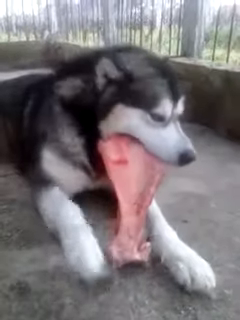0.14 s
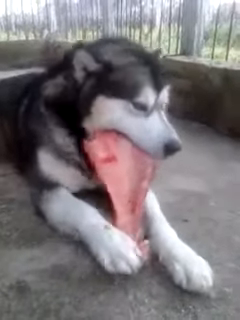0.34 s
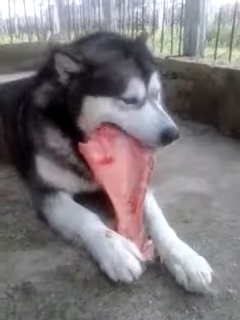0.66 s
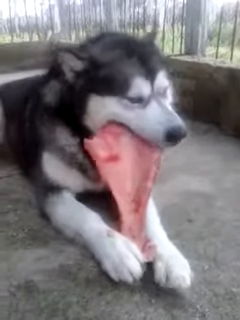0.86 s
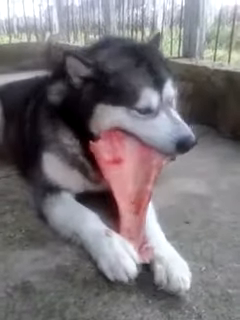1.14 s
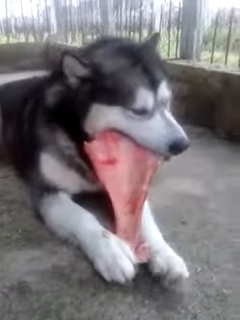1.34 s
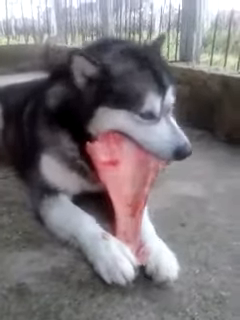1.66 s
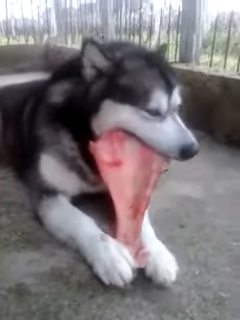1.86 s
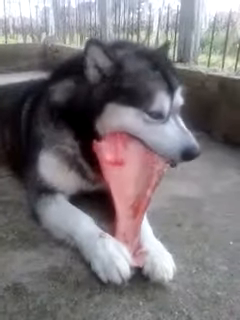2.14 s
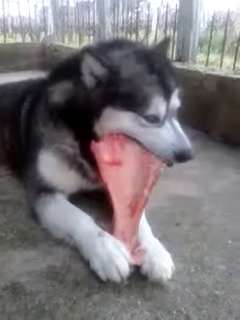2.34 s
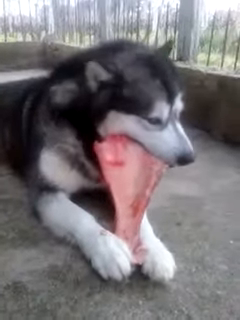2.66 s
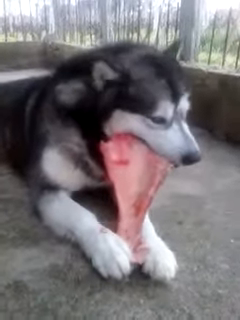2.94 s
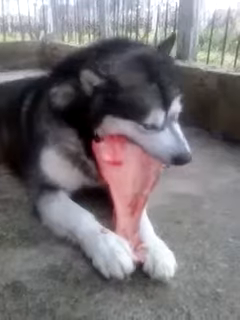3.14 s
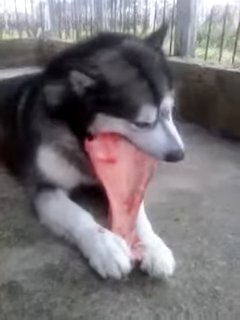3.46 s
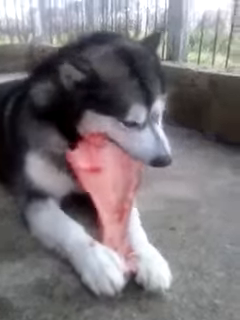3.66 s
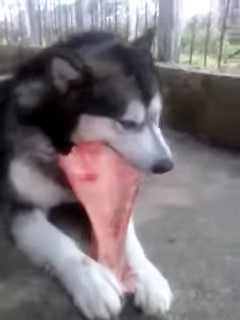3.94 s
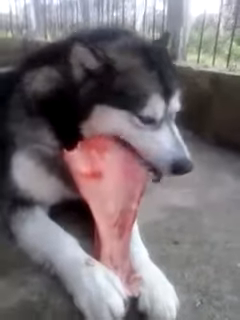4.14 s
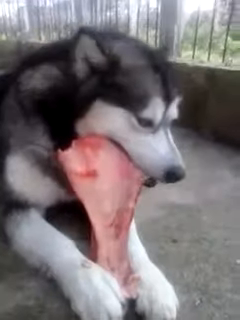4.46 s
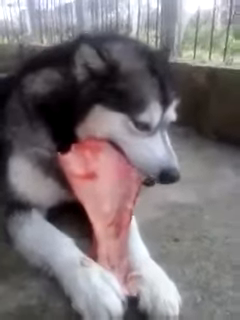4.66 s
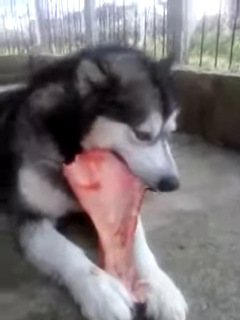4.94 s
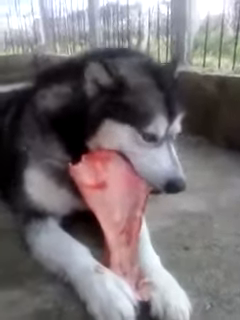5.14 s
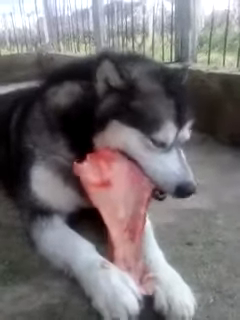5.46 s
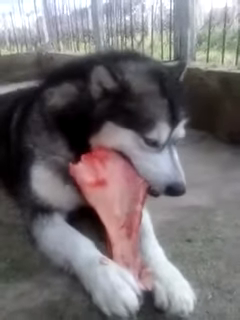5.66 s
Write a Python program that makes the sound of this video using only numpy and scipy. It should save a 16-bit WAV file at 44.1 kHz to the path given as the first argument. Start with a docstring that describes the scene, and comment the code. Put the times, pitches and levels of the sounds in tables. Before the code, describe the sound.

Brittle bone crunches in short loud bursts between quiet wet grinding and soft knocks, as a dog chews outdoors on a hard terrace.

```python
"""On a concrete terrace, close by, a dog scuffs a paw, then gnaws a big raw bone.
Rasps are dense trains of tiny slips, cracks are short snaps, and knocks are dull, briefly ringing blows.
These sounds and a faint grinding ring on, come directly and off the floor, and leave a faint tail.
A dragged tooth squeaks, two low thumps sound under loud cracks, and a far-off whine sinks away at the start.
Shaped noise makes the rumble and hiss of the outdoor background."""
import sys
import numpy as np
from scipy import signal
from scipy.fft import rfft, irfft
from scipy.io import wavfile
from scipy.ndimage import uniform_filter1d, minimum_filter1d, map_coordinates

SR = 44100
rng = np.random.default_rng(int(sys.argv[2]) if len(sys.argv) > 2 else 0)


def dump(signal):
    """Clip the signal to [-1, 1] and save it as 16-bit WAV at the path in sys.argv[1]."""
    limited = np.clip(np.atleast_2d(signal).T, -1, 1)
    pcm = np.round(limited * 32767).astype(np.int16)
    wavfile.write(sys.argv[1], SR, pcm)


N = 255339  # length [samples]
TIME = np.arange(N) / SR  # [s]
TAPS = 2048  # length of each impulse response [samples]
BLOW_S = .006  # a crack or knock has the energy of its level held for this long [s]
SLIPS_PER_S = 2400

# scrapes that swell and let go: a paw scuffing the concrete in the first two rows, then bites:
# (time of greatest pressure [s], rise [s], release [s], level [dB], extra body below 1 kHz [dB],
# extra zing near 8 kHz [dB], extra air above 11 kHz [dB], pitch of the scraped spot [Hz])
SCRAPES = [(0.241, 0.027, 0.046, -41.5, 13, -3, -3, 1340), (.268, 0.037, 0.039, -37.5, 12, -8, -7, 3060),
           (0.395, 0.02, 0.089, -48, 10.5, -4.5, -4, 2100), (0.987, 0.028, .05, -55.5, 18.5, -12, -13, 540),
           (1.433, .05, .018, -33, -2.5, 3, 3.5, 2480), (1.483, 0.045, .022, -41, -8, -5, 8, 8000),
           (1.522, 0.074, 0.065, -42, 1.5, -1, 6, 8000), (1.97, 0.055, .04, -53.5, 8.5, 2.5, 5, 7140),
           (2.068, 0.065, 0.045, -54, 13.5, -3.5, 1.5, 1510), (2.171, 0.03, .06, -56.5, 10, -2, 6, 7500),
           (2.324, 0.042, 0.035, -43.5, 8.5, 2, -3, 1340), (2.384, 0.027, 0.098, -31, -2.5, 0.5, 0, 7470),
           (2.505, 0.015, 0.014, -15.5, -0.5, -0.5, -1.5, 8250),
           (2.563, 0.021, 0.014, -40, -31, 4, 4.5, 6770), (3.232, 0.02, 0.048, -46, 3.5, 2.5, 3, 8640),
           (3.387, 0.013, 0.023, -40, 2, 2.5, 5, 7640), (3.434, 0.023, 0.046, -41, -3, -3, 0.5, 8800),
           (3.601, 0.062, 0.031, -26, 4, -0.5, -1, 8050), (3.661, 0.011, 0.0065, -13, 3.5, -4, -2, 8140),
           (3.686, 0.015, 0.019, -31, -33, -2, 4, 8100), (3.954, 0.15, 0.1, -57.5, 9.5, -6, -5, 7400),
           (4.224, .04, 0.091, -55, 8.5, -2.5, -5, 7800), (4.599, 0.048, 0.035, -53, 3, -4.5, 3, 8040),
           (4.681, .04, 0.042, -41.5, 7, -3, -2, 8500), (4.728, 0.038, 0.08, -41, 9.5, -1.5, 2.5, 5300),
           (4.789, 0.017, 0.032, -34, 4.5, 4, 1.5, 5400), (4.895, 0.023, 0.035, -24.5, -1, 0, 2.5, 2130),
           (4.954, 0.018, 0.013, -12, 0, 3, 2, 1940), (5.14, 0.084, 0.078, -55.5, 5, -8.5, -14, 8400),
           (5.431, 0.058, 0.077, -56, 4, -2, -6, 4400), (5.663, 0.0099, 0.006, -35, 13.5, 3.5, 3, 1850)]


def gain_of(db):
    """Turns decibels into amplitude."""
    return 10 ** (np.asarray(db) / 20)


def evened(x):
    """Scales a signal to an rms (average strength) of one."""
    return x / np.sqrt(np.mean(x ** 2) + 1e-20)


def read(points, hz):
    """Reads a curve of (Hz, value) points joined on a logarithmic frequency axis."""
    f, value = np.transpose(points)
    return np.interp(np.log(hz + 1), np.log(f + 1), value)


def add(mix, s, sound):
    """Mixes a sound in, starting at time s."""
    part = mix[max(round(s * SR), 0):][:len(sound)]
    part += sound[:len(part)]


def hump(hz, centre_hz, width=.11):
    """The outline of one resonance, of height one; width is its half width as a share of its pitch."""
    return 1 / (1 + ((hz / centre_hz - 1) / width) ** 2)


def wander(rate_hz):
    """A random signal of rms one, with little movement faster than rate_hz."""
    hz = np.fft.rfftfreq(N, 1 / SR)
    spectrum = rfft(rng.standard_normal(N))
    return evened(irfft(spectrum * np.exp(-(hz / rate_hz) ** 2), N))


def response(curve_db):
    """A pulse of energy one that starts at once and whose spectrum has the shape of curve_db(Hz)."""
    log_gain = np.log(gain_of(curve_db(abs(np.fft.fftfreq(TAPS, 1 / SR)))))
    # the Hilbert transform finds the phase that lets the energy come as early as possible
    spectrum = np.exp(np.conj(signal.hilbert(log_gain)))
    pulse = np.fft.ifft(spectrum).real
    return pulse / np.linalg.norm(pulse)


def splinter(body_db, zing_db, air_db, own_hz, own_db=6):
    """A short snap with the brittle spectrum of breaking bone, tinted, with a brief ring of its own."""
    # breaking bone: (frequency [Hz], relative level [dB per Hz])
    brittle = [(59, -59.5), (100, -43), (497, -10), (668, -13), (727, -7), (843, -10), (1210, -6.5),
               (1960, -4), (2370, -5), (3850, -5), (6260, -10), (8230, -2), (9950, -13.5), (12300, -10),
               (15500, -25.5)]
    tint = [(900, body_db), (1900, 0), (5000, 0.014), (7200, zing_db), (9000, zing_db), (11000, air_db)]
    return response(lambda hz: read(brittle, hz) + read(tint, hz) + own_db * hump(hz, own_hz))


def grains(per_s, spread_db):
    """A train of tiny slips at random moments, of uneven size and either sign, with rms one."""
    chance, size, sign = rng.random((N, 3)).T
    sizes = gain_of(spread_db * np.minimum(-np.log(1 - size), 3))
    happens = chance < per_s / SR
    return evened(sizes * np.sign(sign - .5) * happens)


def dispersed(snap, run_s, chance, uneven_db):
    """Each part of the spectrum leaves the contact at its own moment and with its own strength."""
    spectrum = rfft(snap)
    place = np.linspace(0, 1, len(spectrum))
    moment, strength = (np.interp(place, np.linspace(0, 1, len(c)), c) for c in chance)
    delay_s = .0005 + moment * run_s
    # a delay that depends on frequency is a phase that adds up along the spectrum
    phase = 2 * np.pi * np.cumsum(delay_s) * SR / len(snap)
    uneven = spectrum * gain_of(uneven_db * strength)
    fade = np.minimum(np.linspace(2, 0, len(snap)), 1) ** 2
    ragged = fade * irfft(uneven * np.exp(-1j * phase))
    return ragged / np.linalg.norm(ragged)


def singing(rows, width_hz):
    """An unsteady tone that flutters in pitch and strength along rows of (s, Hz, dB)."""
    s, hz, db = np.transpose(rows)
    pitch_hz = np.interp(TIME, s, hz) + width_hz * wander(width_hz) / 2
    turns = np.cumsum(pitch_hz) / SR
    level = gain_of(np.interp(TIME, s, db)) * (TIME >= s[0]) * (TIME <= s[-1])
    flutter = 1 + wander(width_hz) / 2
    return np.sqrt(2) * level * flutter * np.sin(2 * np.pi * turns)


def background(level_db=-62):
    """Noise forms a distant rumble that comes and goes, under a thin steady hiss."""
    # outdoor background: (frequency [Hz], relative level [dB per Hz])
    air = [(15, -29), (25, -9.5), (129, -7), (297, -19.5), (482, -20), (631, -27), (826, -29), (1270, -24),
           (9810, -39.5), (15500, -29)]
    hz = np.fft.rfftfreq(N, 1 / SR)
    spectrum = rfft(rng.standard_normal(N)) * gain_of(read(air, hz))
    rumble = irfft(spectrum * (hz < 200), N)
    hiss = irfft(spectrum * (hz >= 200), N)
    swell_db = 2.5 * wander(rate_hz=6)
    return gain_of(level_db) * evened(rumble * gain_of(swell_db) + hiss)


def whine():
    """A faint far-off whine, a fluttering tone, sinks away."""
    # path of the whine: (time [s], pitch [Hz], level [dB])
    whine_path = [(0, 1115, -64), (.1, 1080, -67), (.2, 1020, -78), (.3, 925, -73), (.42, 800, -73),
                  (.52, 775, -80)]
    return singing(whine_path, width_hz=170)


def scatter(t60, onset_s):
    """Random reflections of energy one, with each band dying at its own speed."""
    hz, t, z = signal.stft(rng.standard_normal(SR), SR, nperseg=256)
    # t60 is the time a band takes to fall by 60 dB
    decay = np.exp(-np.log(1000) * t / read(t60, hz)[:, None])
    tail = signal.istft(z * decay, SR, nperseg=256)[1]
    tail *= 1 - np.exp(-(np.arange(len(tail)) / SR / onset_s) ** 2)
    return tail / np.linalg.norm(tail)


def terrace(x, near_db=-7, far_db=-22, count=5):
    """Paws, chest and a low wall scatter sound quickly, farther walls linger; the pattern keeps shifting."""
    # tail of the terrace: (frequency [Hz], time to fall by 60 dB [s])
    far_decay = [(200, 0.36), (900, 0.41), (2000, 0.31), (8000, 0.23), (15000, 0.31)]
    near_decay = [(500, 0.07), (3000, 0.064), (8000, 0.055), (15000, 0.012)]
    out = x.copy()
    pose = TIME * 14  # the patterns take turns, 14 a second, blending into each other
    for k in range(count):
        share = np.cos(np.pi / 2 * np.minimum(abs((pose - k) % count - 1), 1))
        near = scatter(near_decay, onset_s=0.00038)
        far = scatter(far_decay, onset_s=0.016)
        out += signal.oaconvolve(x * share, gain_of(near_db) * near + gain_of(far_db) * far)[:N]
    return out


def floor_echo(x):
    """The concrete mirrors each sound; the echo wins when the head shades the direct path."""
    # path by way of the floor: (time [s], echo delay [ms], echo against direct sound [dB])
    floor_path = [(0, 2.93, -9.5), (1.3, 3.33, 11), (2.4, 3.11, 2), (3.249, 3.24, 5.5), (3.65, 2.9, 14.5),
                  (4.7, 3.45, 5), (5.79, 3.27, -12.5)]
    s, delay_ms, echo_db = np.transpose(floor_path)
    late = np.arange(N) - np.interp(TIME, s, delay_ms) * SR / 1000  # where to read, in samples
    echo = gain_of(np.interp(TIME, s, echo_db))
    mirrored = map_coordinates(x, [late], order=3)
    return (x + echo * mirrored) / np.sqrt(1 + echo ** 2)


def thumps():
    """Two short low thumps under loud cracks: each pulse swings up, then down, and does not ring."""
    # thumps: (time [s], level [dB])
    thump_rows = [(2.354, -60), (4.955, -44)]
    out = np.zeros(N)
    u = np.arange(SR // 10) / SR / .0025  # time in steps of 2.5 ms
    pulse = 2 * u * (2 - u) * np.exp(-u)
    for s, db in thump_rows:
        add(out, s, gain_of(db) * pulse)
    return out


def squeak():
    """The bone squeaks under a slowly dragged tooth: a fluttering tone."""
    # path of the squeak: (time [s], pitch [Hz], level [dB])
    squeak_path = [(3.38, 850, -72), (3.55, 840, -63), (3.595, 845, -41), (3.61, 840, -30),
                   (3.62, 830, -46), (3.65, 840, -64)]
    return singing(squeak_path, width_hz=40)


def bone(x):
    """Every sound passed in also rings the modes (natural pitches) of the bone, which die away."""
    # ringing of the bone: (frequency [Hz], relative level [dB], time to fall by 60 dB [s])
    bone_modes = [(845, 0, .09), (1990, -5, .07), (2680, -8, .07), (3070, -8, .09), (3450, -8, .07),
                  (3920, -10, .07), (7450, -14, .04), (8300, -14, .025)]
    t = np.arange(SR // 5) / SR
    ring = np.zeros(len(t))
    for hz, db, t60 in bone_modes:
        decay = np.exp(-np.log(1000) * t / t60)
        ring += 2 * gain_of(db) * decay / decay.sum() * np.cos(2 * np.pi * hz * t)
    return x + signal.oaconvolve(x, ring)[:N]


def grinding(trim_db=-2.5):
    """Teeth at work on meat and gristle make a faint wet crackle of many tiny slips."""
    # soft grinding, before the trim: (time [s], level [dB])
    grind_levels = [(0, -60.5), (.44, -69.5), (.82, -63.5), (.9, -73), (1.05, -63.5), (1.6, -60.5),
                    (1.85, -69), (2.33, -60.5), (2.9, -72), (3.03, -64), (3.33, -68.5), (3.52, -53),
                    (4.05, -62.5), (4.52, -65), (4.85, -53.5), (5.04, -68.5), (5.4, -65), (5.79, -59)]
    slips = grains(SLIPS_PER_S, spread_db=4)
    crackle = slips * gain_of(np.interp(TIME, *np.transpose(grind_levels)) + trim_db)
    return signal.oaconvolve(crackle, splinter(body_db=7, zing_db=2, air_db=4, own_hz=1310, own_db=3.5))[:N]


def knocks(trim_db=-1):
    """Soft, slightly slipping blows of jaw and bone briefly ring the mouth cavity."""
    # knocks, before the trim: (time [s], level [dB], mouth resonance [Hz], its height [dB],
    # extra treble [dB])
    knock_rows = [(0.055, -31, 473, 16, 14), (0.065, -33.5, 475, 17.5, 12.5), (.137, -54.5, 3180, 8, 24),
                  (0.97, -44.5, 427, 21, 10), (1.1253, -26.5, 1250, 11, 9.5), (1.924, -51, 657, 3, -11),
                  (2.052, -46, 1274, 5, 5.5), (3.013, -54, 1600, 15, 23), (3.081, -54, 2260, 18, 15),
                  (4.077, -50.5, 1410, 18, 24), (4.295, -46.5, 330, 6, -1.5), (4.37, -36, 480, 8, 10.5),
                  (4.402, -46, 1970, 1, 13.5), (4.649, -34, 1007, 0, 12.5), (5.484, -32, 1500, 6.5, 12),
                  (5.664, -28.5, 942, 18.5, 22.5), (5.667, -29, 390, 5, 4)]
    # a blow cushioned by meat: (frequency [Hz], relative level [dB per Hz])
    dull = [(80, -35.5), (200, -13), (330, -1), (480, -1.5), (1200, -2), (1900, -8), (2600, -18.5),
            (4200, -26.5), (5600, -35.5), (8000, -31.5), (15000, -51.5)]
    out = np.zeros(N)
    run_s = .002  # time over which the slipping spreads the blow
    chances = rng.random(size=(len(knock_rows), 2, 50))
    for (s, db, mouth_hz, height_db, treble_db), chance in zip(knock_rows, chances):
        treble = [(1500, 0), (3500, treble_db)]
        # the soft mouth rings broadly
        blow = response(lambda hz: read(dull, hz) + height_db * hump(hz, mouth_hz, width=.25) + read(treble, hz))
        blow = dispersed(blow, run_s, chance, uneven_db=5)
        add(out, s - run_s / 2, gain_of(db + trim_db) * np.sqrt(BLOW_S * SR) * blow)
    return out


def cracks(trim_db=-1.5):
    """Loud fractures snap at once, faint ones crumble more slowly; the nearest scrape colours each."""
    # splinters snapping off and teeth clicking, before the trim: (time [s], level [dB],
    # hardness: more zing and less body than the nearest scrape [dB])
    crack_rows = [(.392, -34.5, 7.5), (1.033, -43.5, 8), (1.356, -48, 7.5), (1.385, -49, 5),
                  (1.411, -35, 3), (1.4757, -30.5, 7), (1.484, -30.5, 5), (1.591, -46, 3.5),
                  (2.073, -40.5, 0), (2.164, -46.5, 10), (2.288, -48, 2), (2.355, -10.5, -4.5),
                  (2.3797, -15.5, 5.5), (2.3964, -13, 2.5), (2.412, -29.5, -0.5), (2.468, -25.5, 3),
                  (2.4987, -21.5, -5.5), (2.605, -43, 0.5), (3.212, -40, 1), (3.2232, -32, 1),
                  (3.2382, -31, 5), (3.254, -38, 2), (3.3802, -34, 8), (3.4264, -36.5, -3),
                  (3.4346, -33.5, 13), (3.5694, -21.5, 8), (3.585, -13, 8), (3.6005, -12, 10.5),
                  (3.6102, -14.5, 8), (3.644, -22, 9), (3.651, -31.5, 18), (3.6581, -14.5, 7.5),
                  (3.7, -47.5, -14.5), (3.947, -45.5, 0.5), (3.988, -50.5, 2), (4.134, -54, 12),
                  (4.181, -41, 5), (4.631, -39.5, 3.5), (4.674, -43, 1.5), (4.691, -43.5, 0.5),
                  (4.7125, -34, 2), (4.737, -29, 4), (4.7814, -29.5, -2.5), (4.791, -38, -6),
                  (4.8953, -17, -0.5), (4.943, -29, 16), (4.9548, -18, -3.5), (5.2075, -51.5, -1.5),
                  (5.251, -52, 0.5), (5.776, -44.5, 10)]
    out = np.zeros(N)
    for (s, db, hard_db), chance in zip(crack_rows, rng.random(size=(len(crack_rows), 2, 26))):
        nearest = min(SCRAPES, key=lambda scrape: abs(scrape[0] - s))
        body_db, zing_db, air_db, spot_hz = nearest[4:]
        snap = splinter(body_db - hard_db, zing_db + hard_db, air_db + .3 * hard_db, spot_hz)
        run_s = np.interp(db, [-45, -20], [.004, .0016])  # how long the fracture takes
        snap = dispersed(snap, run_s, chance, uneven_db=8)
        add(out, s - run_s / 2, gain_of(db + trim_db) * np.sqrt(BLOW_S * SR) * snap)
    return out


def pressure(t, rise_s, release_s):
    """The swell of a scrape, one at t = 0; it gains and loses 26.5 dB over its rise and release."""
    away = np.maximum(-t / max(rise_s, .003), t / max(release_s, .003))
    return gain_of(-26.5 * abs(away) ** 1.66)  # a power of 1 would change evenly in dB


def rasps(trim_db=-0.5, count=4):
    """A paw, then teeth, drag from spot to spot: dense slips swell and let go, amid sparse crackles."""
    crumbs_db, crumbs_follow = -38.5, .4  # crackles take this share of the scrape's level in dB
    crumbs_before_s, crumbs_after_s = .058, .037
    spot_s = .004  # the scrape meets the next spot, with its own ragged colour, this often
    out = np.zeros(N)
    slips = grains(SLIPS_PER_S, spread_db=9)
    crumbs = grains(per_s=510, spread_db=4)
    for (s, rise_s, release_s, db, *tint), chances in zip(SCRAPES, rng.random(size=(len(SCRAPES), count, 2, 26))):
        during = abs(TIME - s) < .25
        t = TIME[during] - s
        swell = pressure(t, rise_s, release_s)
        stroke = gain_of(db) * evened(slips[during] * swell) * np.sqrt(np.mean(swell ** 2))
        crumb_swell = pressure(t, crumbs_before_s, crumbs_after_s)
        stroke += gain_of(crumbs_db + crumbs_follow * db) * crumbs[during] * crumb_swell
        snap = splinter(*tint)
        for spot, chance in enumerate(chances):
            ragged = gain_of(trim_db) * dispersed(snap, .0006, chance, uneven_db=12)
            on_spot = t // spot_s % count == spot
            add(out, TIME[during][0], signal.fftconvolve(stroke * on_spot, ragged))
    return out


def scene():
    """The scuffing and gnawing in their place, over the background."""
    contacts = bone(cracks() + rasps() + grinding() + knocks())
    near = floor_echo(contacts) + squeak()
    return (terrace(near) + thumps() + whine() + background())[None]


def record(dry):
    """A fast limiter holds the loudest peaks; then the lowest and highest frequencies are cut."""
    allowed = np.minimum(.78 / (abs(dry) + 1e-9), 1)
    held = dry * uniform_filter1d(minimum_filter1d(allowed, size=31), size=31)
    held = signal.sosfilt(signal.butter(2, 48, "highpass", fs=SR, output="sos"), held)
    top_cut = signal.firwin(401, 15950, window=("kaiser", 8), fs=SR)
    return signal.oaconvolve(held, top_cut[None], "same")


dry = scene()
out = record(dry)
dump(out)
```